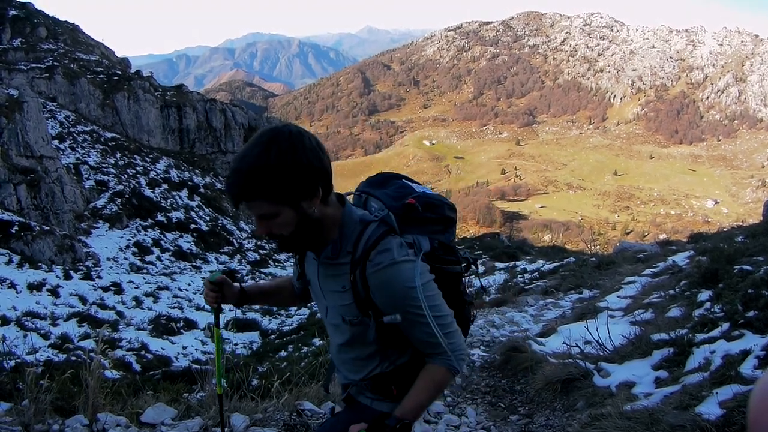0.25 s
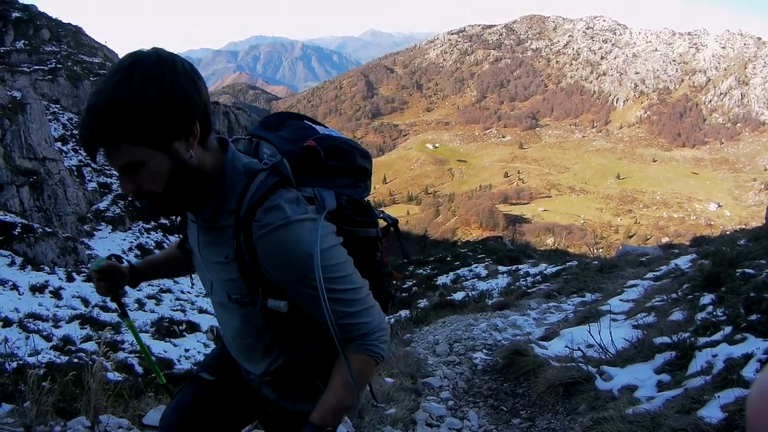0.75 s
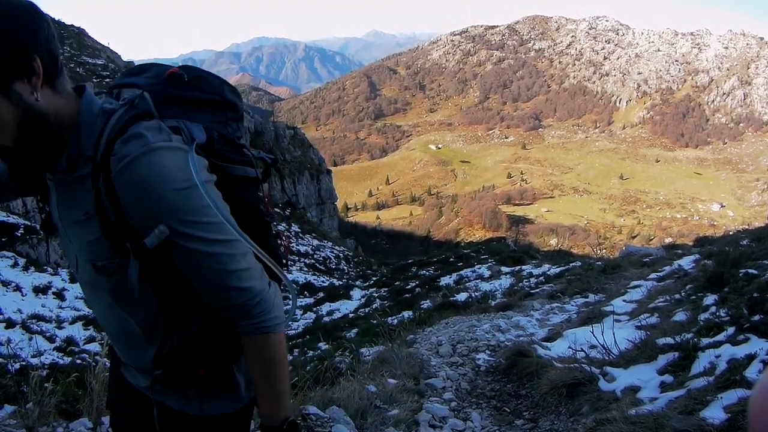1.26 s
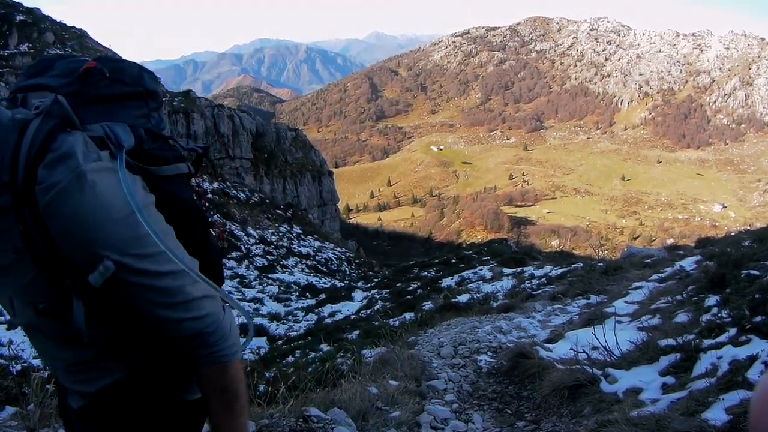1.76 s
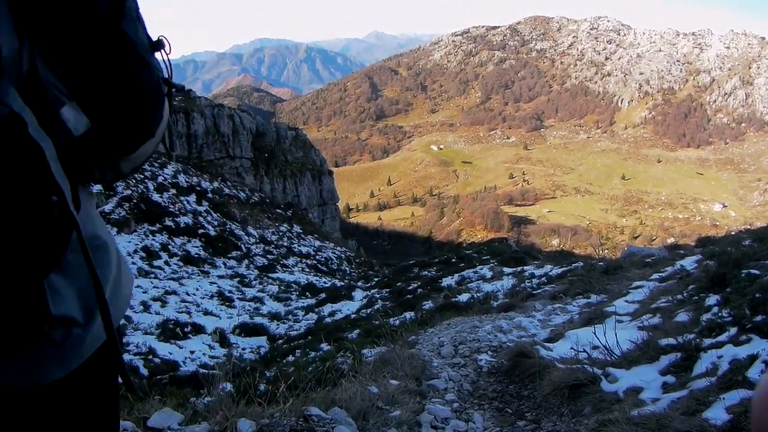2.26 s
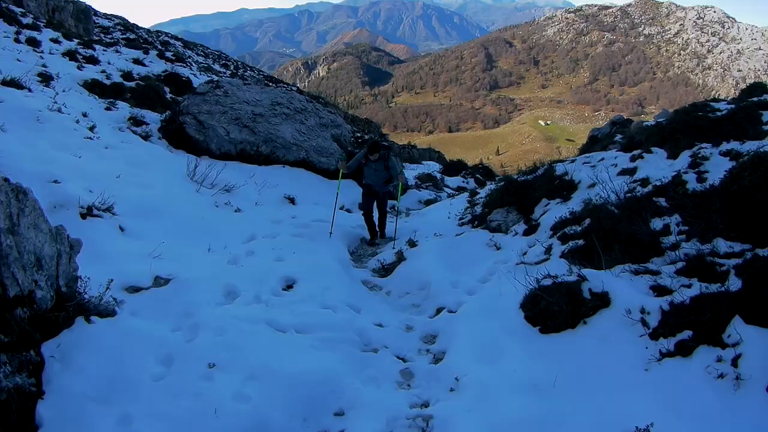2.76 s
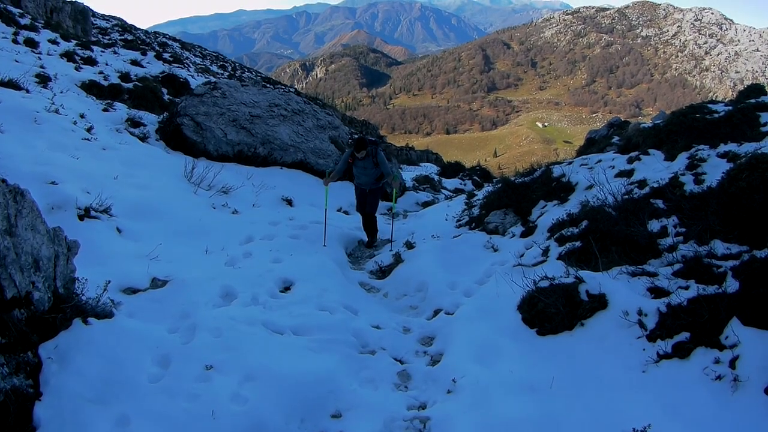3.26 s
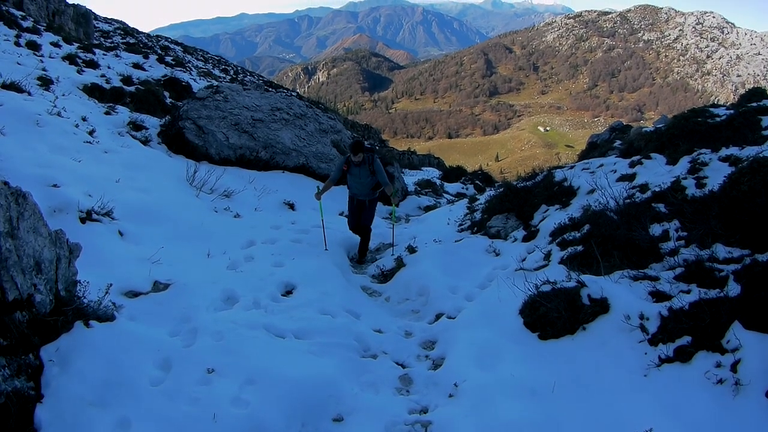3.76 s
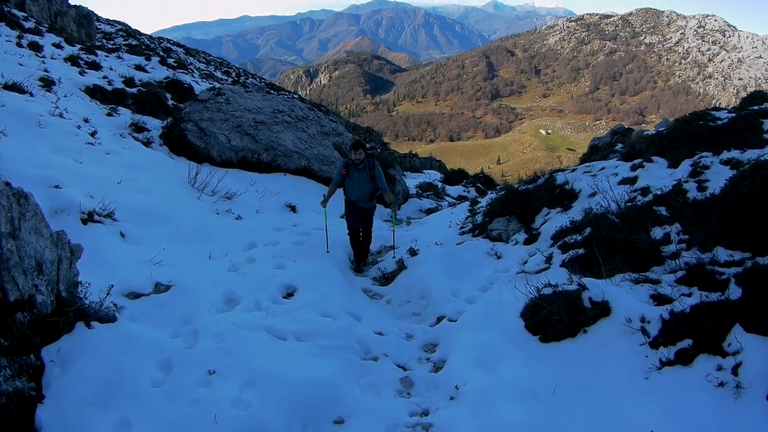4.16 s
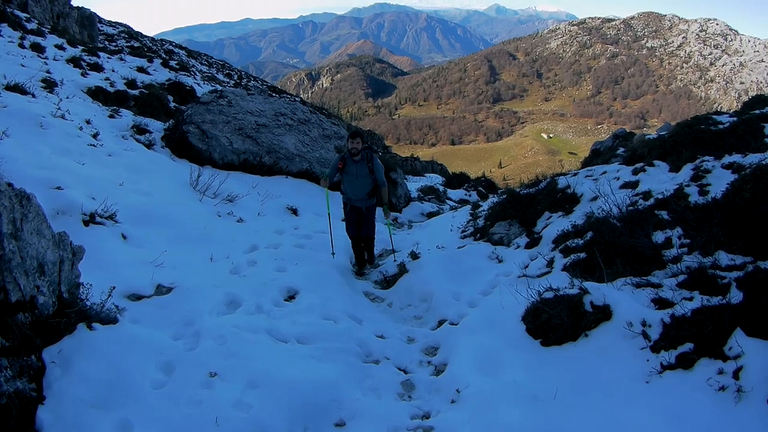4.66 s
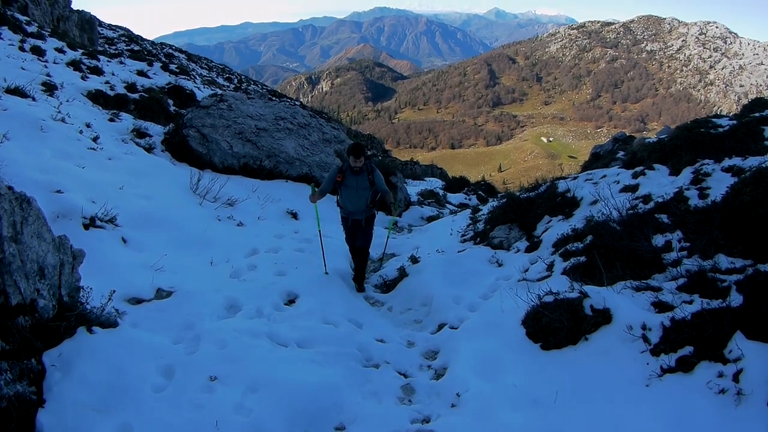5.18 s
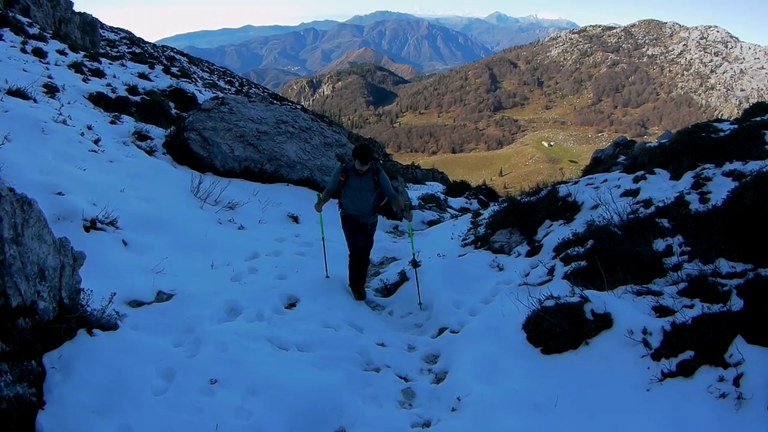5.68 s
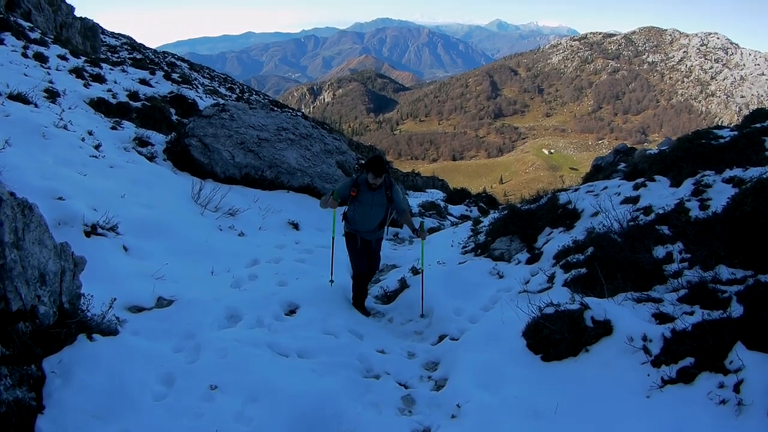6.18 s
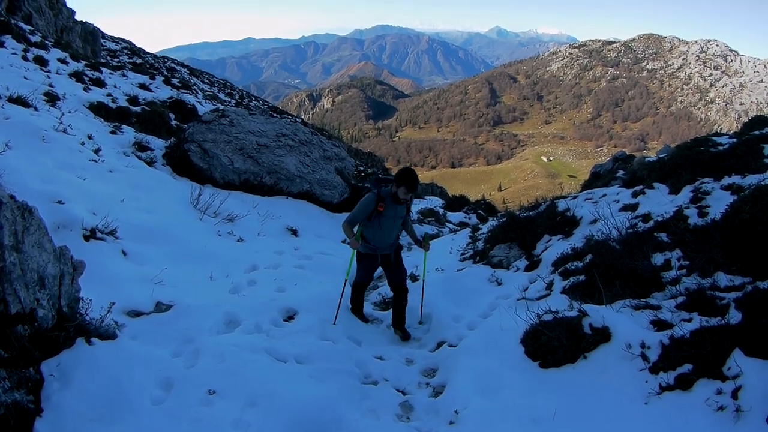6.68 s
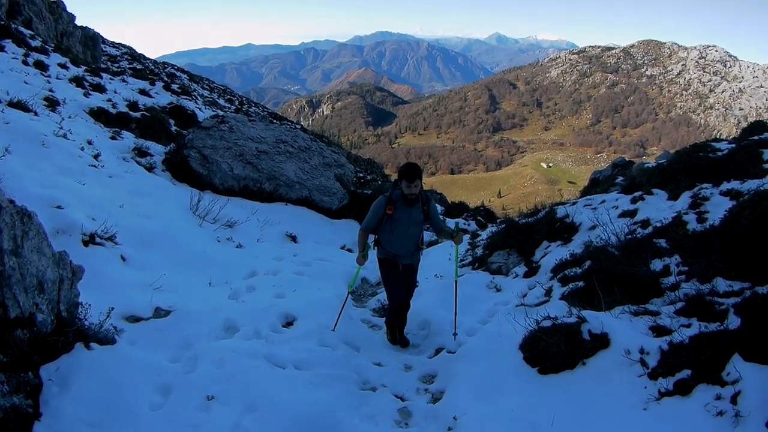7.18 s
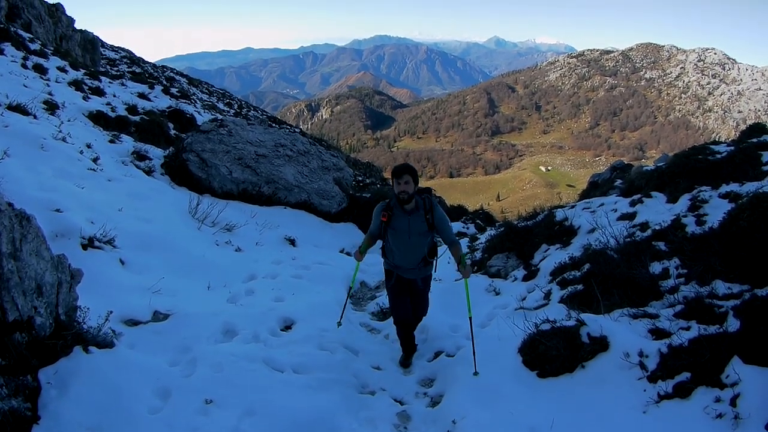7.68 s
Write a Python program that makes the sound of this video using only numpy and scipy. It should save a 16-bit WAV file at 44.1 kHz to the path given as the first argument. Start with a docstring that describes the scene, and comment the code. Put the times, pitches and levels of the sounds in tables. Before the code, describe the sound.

Outdoors on a mountain slope, stones tick, then clatter hard and briefly ring as boots pass close by, with gravel grinding and dull thuds beneath. The densest rattle comes just before a bright click and sudden scene change. Then come separated snow steps, more distant, each a dry crust crack with a grainy crunch, closer together near the end. Soft air and slight wind rumble lie underneath.

```python
"""A hiker with poles climbs past a small camera over loose scree: stones clack, ring briefly and slide, boots thud.
After a cut, further off, boots and pole tips crunch through crusted snow in spaced steps, under thin mountain air.
Stone knocks and crust cracks are short bursts of filtered noise; slides and crunches are crowds of tiny grains.
Thuds are quickly fading low tones with some noise; the air is coloured noise with a rumble and a faint whine."""
import sys
import numpy as np
from scipy import signal
from scipy.fft import rfft, irfft
from scipy.io import wavfile
from scipy.ndimage import uniform_filter1d

SR = 44100
rng = np.random.default_rng(int(sys.argv[2]) if len(sys.argv) > 2 else 0)


def dump(signal):
    """Clip the signal to [-1, 1] and save it as 16-bit WAV at the path in sys.argv[1]."""
    limited = np.clip(np.atleast_2d(signal).T, -1, 1)
    pcm = np.round(limited * 32767).astype(np.int16)
    wavfile.write(sys.argv[1], SR, pcm)


N = 349801
CUT_S = 2.799  # the scree scene ends and the snow scene starts here


def undb(db):
    """Turn decibels into a plain gain."""
    return 10 ** (np.asarray(db) / 20)


def unit(x):
    """Scale a sound to an average (RMS) level of 1."""
    return x / np.sqrt(np.mean(x ** 2))


def curve(rows):
    """Draw straight lines between the rows of a (t/s, ..) table: one curve per column."""
    t_s, *columns = np.transpose(rows)
    return [np.interp(np.arange(N) / SR, t_s, column) for column in columns]


def colour(x, points):
    """Filter with the gains of (f/Hz, gain/dB) points, without sounding ahead of time (minimum phase)."""
    hz, db = np.transpose(points)
    grid_hz = np.maximum(np.arange(1025) * SR / 2048, 1)
    gain_db = np.interp(np.log(grid_hz), np.log(hz), db)
    # folding the cepstrum moves the whole response after time zero
    cepstrum = irfft(np.log(undb(gain_db)))
    cepstrum[1:1024] *= 2
    cepstrum[1025:] = 0
    response = irfft(np.exp(rfft(cepstrum)))
    return signal.fftconvolve(x, response)[:N]


def band(x, lo_hz, hi_hz):
    """Keep mainly the pitches between two frequencies."""
    sos = signal.butter(2, [lo_hz, min(hi_hz, .45 * SR)], "band", fs=SR, output="sos")
    return signal.sosfilt(sos, x)


def walk(rate):
    """Wander at random: levels held for 1 / rate s, then smoothed twice; spread near 1."""
    hold = int(SR / rate)
    steps = np.repeat(rng.standard_normal(N // hold + 1), hold)
    return 1.3 * uniform_filter1d(uniform_filter1d(steps, hold), hold)[:N]


def add(out, s, piece, db):
    """Mix a piece in at time s with the given peak."""
    start = int(s * SR)
    piece = piece[:N - start]
    out[start:start + len(piece)] += piece * undb(db) / np.max(np.abs(piece))


def grains(rate, spread_db, smear_s, fine):
    """Tiny fractures at random moments, each a short noisy burst, over a share of grains too fine to tell apart."""
    breaks = rng.random(N) < rate / SR  # rate: breaks per second
    sizes = breaks * undb(spread_db * np.minimum(rng.exponential(size=N), 4))
    fade = np.exp(-1 / (smear_s * SR))
    bursts = unit(signal.lfilter([1], [1, -fade], sizes))
    return unit((bursts + fine) * rng.standard_normal(N))


def crushing(levels, spectrum, rate, spread_db, smear_s, fine, shared, creak):
    """Grains break under load, each size at its own moments and pitch; the packed mass answers in the lower mids."""
    load_db, mass_db = levels
    edges_hz = [300, 1000, 1700, 2600, 3600, 5000, 7500, 19000]
    mixed = shared * grains(rate, spread_db, smear_s / 2, fine)  # breaks heard at every pitch at once
    for lo_hz, hi_hz in zip(edges_hz, edges_hz[1:]):
        mixed = mixed + band(grains(rate, spread_db, smear_s, fine), lo_hz, hi_hz)
    grit = colour(mixed * undb(load_db), spectrum) / np.std(colour(mixed, spectrum))

    lumps = grains(rate, spread_db / 2, 3 * smear_s, fine)
    loaded = lumps * undb(mass_db)
    body = band(loaded, 180, 590)
    body += creak * band(loaded, 1050, 1350)  # squeezed lumps creak
    return grit + body / np.std(band(lumps, 120, 580))


def strays(load_db, span, count, over_db, spread_db, treble_db):
    """Small knocks at chance moments, as strong as the load of that moment allows."""
    when, size, pitch, ring = rng.random((count, 4)).T
    s = span[0] + (span[1] - span[0]) * when
    db = load_db[(s * SR).astype(int)] + over_db + spread_db * size
    hz, t60 = 1100 * 4 ** pitch, .004 + 0.023 * ring
    return [(*row, treble_db, decay) for *row, decay in zip(s, db, hz, t60)]


def knocks(table, sharpness, ring_db, chips_db, settle_db, snap, rise_s):
    """Each blow is a snap and a rough tail: a main resonance, three chance ones, crack, treble and lower mids."""
    out, t = np.zeros(N), np.arange(6144) / SR
    half = 1 / (2 * sharpness)  # half the width of a resonance, as a share of its pitch
    for s, db, hz, treble_db, t60 in table:
        # higher rings come with weaker lower mids
        low_db = -15.5 - 5.5 * np.log2(hz / 2000) + 3.5 * rng.standard_normal()
        fall = np.exp(-np.log(1000) * t / max(t60, .003))
        # neighbours shift and settle for a while after the blow
        settling = undb(settle_db) * np.exp(-np.log(1000) * t / (t60 + 0.091))
        force = rng.standard_normal((4, len(t))) * (1 - np.exp(-t / rise_s)) * (fall + settling)
        force[:, int(rise_s * SR)] += snap  # first contact
        ring = band(force[0], hz * (1 - half), hz * (1 + half))
        add(out, s, ring, db + ring_db)
        chips_hz = rng.uniform(1500, 5230, size=3)
        chips = sum(band(force[1], f * (1 - half), f * (1 + half)) for f in chips_hz)
        add(out, s, chips, db + chips_db)
        crack = band(band(force[1], 1300, 6000), 1300, 6000)
        add(out, s, crack, db - 3.5)
        treble = band(band(force[2], 4400, 11000), 5200, 12500)
        add(out, s, treble, db + treble_db)
        add(out, s, band(force[3], 700, 1400), db + low_db)
    return out


def air():
    """Open-slope hush with a slow swell, wind rumble and a faint whine."""
    # tone of the hush: f/Hz, relative level/dB
    hush_tone = [(12, -27), (20, 2), (38, -11.5), (130, -5), (158, -8), (388, -10), (422, -8.5), (718, -15),
                 (1530, -24), (1710, -20.5), (2080, -21.5), (9400, -30), (16000, -29.5)]
    # wind on the microphone: t/s, middle level/dB
    gusts = [(0.0, -69), (0.37, -62), (0.82, -72), (1.3, -61), (1.7, -62), (2.36, -54), (2.58, -57.5),
             (3.24, -69), (3.75, -69.5), (4.02, -73.5), (5.1, -68.5), (5.56, -74), (5.87, -67.5),
             (7.24, -70.5), (7.44, -63.5), (7.93, -79)]
    # thin steady tone: f/Hz, RMS level/dB
    whine_tone = [(13717, -80)]
    hush = unit(colour(rng.standard_normal(N), hush_tone)) * undb(-60.5 + 1.8 * walk(2.6))
    rumble = unit(band(rng.standard_normal(N), 22, 90)) * undb(curve(gusts)[0] + 3.3 * walk(11.0))
    (hz, db), = whine_tone
    whine = np.sqrt(2) * undb(db) * np.sin(2 * np.pi * hz * np.arange(N) / SR)
    return hush + rumble + whine


def presses():
    """Each press swells, holds and lets go; overlapping presses add their power."""
    # boot or pole pressing snow: peak t/s, crunch level/dB, body level re crunch/dB,
    # rise/s, hold/s, release/s (rise and release are the times for a 20 dB change)
    pack = [(2.874, -40.5, -12, 0.044, .001, 0.068), (2.936, -62, -8.5, 0.016, 0.49, 0.36),
            (3.501, -59, -2.5, 0.022, 0.11, 0.12), (3.646, -57, 4, .05, 0.0011, 0.1),
            (3.782, -66.5, -7, .02, 0.011, .05), (3.847, -60.5, -10, 0.11, 0.029, 0.052),
            (4.22, -51, -1.5, 0.011, 0.00085, .05), (4.265, -62, -4, .03, 0.042, 0.07),
            (4.364, -56.5, -3.5, 0.026, 0.029, 0.069), (4.625, -61.5, -8.5, .08, .001, .38),
            (4.852, -41.5, -15, 0.005, 0.023, .03), (4.889, -30.5, -21, 0.022, .001, 0.017),
            (4.907, -55, -5, .01, .001, 0.26), (5.005, -41, -7, .006, .012, .03),
            (5.022, -38, -1, 0.021, .001, 0.064), (5.096, -48, -1.5, 0.0098, 0.026, 0.11),
            (5.17, -47.5, 1.5, 0.058, 0.023, 0.11), (5.402, -58, -3.5, .17, 0.0011, 0.21),
            (5.627, -53, -1.5, 0.017, .001, 0.012), (5.737, -31.5, -6, 0.011, 0.00082, .075),
            (5.83, -60, 2, 0.022, 0.051, .03), (5.908, -53.5, -0.5, .04, .001, 0.23),
            (6.01, -44.5, 2.5, 0.036, .001, 0.02), (6.1, -36.5, -3, 0.084, .001, 0.087),
            (6.418, -47.5, -7, 0.0052, 0.011, 0.032), (6.441, -33, -12, 0.01, 0.00093, 0.032),
            (6.482, -56.5, -5, .02, .13, .02), (6.633, -37, -2, 0.015, .001, 0.057),
            (6.71, -49.5, -0.5, 0.055, 0.019, 0.19), (6.775, -53.5, -5.5, .08, 0.097, 0.032),
            (7.301, -41.5, -11, 0.0042, .01, .03), (7.316, -37.5, -2, 0.01, 0.031, 0.028),
            (7.38, -53, 8, 0.019, 0.035, .02), (7.441, -33, -10, 0.029, .001, .12),
            (7.602, -35.5, -6, 0.16, .001, .03), (7.621, -44.5, -6.5, .01, .001, 0.12),
            (7.794, -52, -9, .2, 0.0011, 0.13), (7.925, -62, -9, 0.091, 0.012, .1)]
    t, crunch, body = np.arange(N) / SR, 1e-9, 1e-9
    for s, db, body_db, rise_s, hold_s, release_s in pack:
        away = np.maximum((s - t) / rise_s, (t - s - hold_s) / release_s).clip(0, 8)
        power = undb(db - 20 * away) ** 2
        crunch = crunch + power
        body = body + power * undb(body_db) ** 2
    return 10 * np.log10(crunch), 10 * np.log10(body)


def off_slope(x, share, lag_s):
    """The snow slope sends a second copy just behind; its lag wanders at random, which bands the colour."""
    lag = lag_s * SR * (1 + 0.18 * walk(1.509))
    return x + share * np.interp(np.arange(N) - lag, np.arange(N), x)


def crusted_snow():
    """Snow crust cracks sharply while the snow below crunches as its grains break under each press."""
    # clearest breaks of the crust: t/s, base level/dB, centre f/Hz, treble re base/dB,
    # decay by 60 dB/s (3 ms at least, before the settling tail)
    cracks = [(2.8548, -33, 1900, -12, 0.047), (2.884, -23, 2570, -7.5, 0.045),
              (3.6389, -41, 1045, -1.5, .005), (3.6492, -38.5, 976, -5, .022),
              (4.1844, -40.5, 1120, -20.5, 0.0074), (4.2173, -38, 2463, -10, 0.022),
              (4.3559, -46.5, 1250, -19, .013), (4.8598, -25.5, 2240, -12, .028),
              (4.8858, -14, 2600, -13, 0.027), (4.9607, -40, 2220, -11, 0.0045),
              (5.0173, -29, 2600, -21, 0.0033), (5.0982, -23, 2600, -24, 0.0046),
              (5.1394, -26, 2450, -21, .009), (5.159, -38, 3000, -21, .008),
              (5.1995, -38, 2600, -19, 0.032), (5.2834, -42, 2586, -16, 0.0096),
              (5.5425, -48, 2410, -14.5, 0.0065), (5.6264, -33.5, 2990, -16.5, 0.0025),
              (5.7312, -30, 3920, -6, 0.075), (5.7415, -31, 1080, -3, 0.019),
              (5.7537, -38, 1200, -12, .033), (5.863, -42, 3550, 1, .01), (5.9148, -38, 1220, -15, 0.026),
              (6.045, -32, 1280, -16.5, .047), (6.4145, -29, 4480, -7, .11),
              (6.4235, -25.5, 3810, -17, 0.072), (6.4339, -13.5, 3760, -15, 0.051),
              (6.4381, -27.5, 1490, -15, .059), (6.498, -36, 1340, -24, .01),
              (6.6269, -26, 1960, -12, 0.053), (6.7143, -38, 1015, -14, .059),
              (7.3353, -28.5, 1530, -25.5, 0.088), (7.387, -41, 1500, -18, 0.0092),
              (7.4329, -27, 1310, -21, 0.045), (7.4422, -14, 3680, -28, 0.0043),
              (7.4487, -23, 2930, -1, 0.0093), (7.565, -29.5, 3900, -7, 0.052),
              (7.5932, -21, 2500, -19, .028), (7.6025, -38.5, 1350, -14, 0.013),
              (7.6684, -37, 2920, -19, .005), (7.736, -39, 3730, -18, .009),
              (7.7482, -37, 2920, -23, 0.0095), (7.7775, -37, 3700, -21, .008),
              (7.8572, -39, 2400, -15, .004), (7.9047, -39.5, 3030, -8, 0.0044)]
    # tone of the crunch: f/Hz, relative level/dB
    snow_tone = [(350, -47.5), (600, -2.5), (834, -10), (1310, -4.5), (1700, -8), (2910, -2.5), (3340, -5),
                 (3890, -5.5), (4580, -9.5), (8390, -17), (16000, -25.5)]
    press = presses()
    small = strays(press[0], (CUT_S, N / SR - .01), count=24, over_db=12.5, spread_db=8.0, treble_db=-10.5)
    sound = knocks([*cracks, *small], sharpness=3.64, ring_db=-8.0, chips_db=-8.0,
                   settle_db=-20.5, snap=3.6, rise_s=0.00026)
    sound += crushing(press, snow_tone, rate=400.0, spread_db=4.0, smear_s=0.0025,
                      fine=1.0, shared=0.63, creak=0.51)
    return off_slope(sound, share=0.33, lag_s=0.000835)


def thuds():
    """The sole pushes the ground: a damped low swing roughened by grit, and a slower deep bump."""
    # boot soles landing: t/s, base level/dB, ground f/Hz, deep bump re base/dB, base decay/s (17 ms is added)
    landings = [(0.1406, -39, 356, -28, 0.0099), (0.214, -31.5, 443, -10, 0.026),
                (0.684, -42, 210, -15, 0.024), (0.886, -22.5, 316, -15, 0.01),
                (0.9012, -25.5, 400, -20, 0.0059), (1.0695, -37, 510, -27, 0.0069),
                (1.1744, -30.5, 352, -23, 0.016), (1.2544, -39.5, 450, -11, 0.047),
                (1.3476, -30, 553, -30, 0.068), (1.3542, -24, 376, -28, 0.038),
                (1.4474, -27.5, 382, -35, 0.0059), (1.5149, -34, 480, -31, 0.0058),
                (1.6908, -20, 288, -21, 0.0048), (1.7963, -34, 352, -30, 0.0063),
                (2.0636, -20.5, 500, -37, 0.0061), (2.235, -35, 494, -17, 0.0081),
                (2.3824, -40.5, 185, -11, 0.049), (2.4087, -23, 426, -32, 0.0024),
                (2.508, -15.5, 567, -32, 0.013), (2.596, -48, 500, -20, 0.009), (2.758, -38, 660, 1, 0.037),
                (3.4949, -38.5, 217, -10, 0.03), (3.6407, -39.5, 248, -13.5, 0.054),
                (4.216, -42, 243, -10, 0.022), (5.013, -39.5, 292, -21, 0.048),
                (5.732, -34.5, 152, -9, 0.014), (5.9595, -38.5, 302, -24, 0.017),
                (6.6249, -34, 616, -5, 0.06), (6.646, -34.5, 165, 0, 0.034), (7.325, -35.5, 600, -21, 0.11),
                (7.4323, -34, 584, -14, 0.032), (7.4443, -31, 354, -22, 0.008),
                (7.5952, -51, 272, 2, 0.015)]
    out, t = np.zeros(N), np.arange(8192) / SR
    for s, db, hz, deep_db, t60 in landings:
        swing = (1 - np.exp(-t / 0.003)) * np.exp(-np.log(1000) * t / (t60 + 0.017))
        add(out, s, np.sin(2 * np.pi * hz * t) * swing, db - 2.0)
        grit = band(band(rng.standard_normal(len(t)) * swing, 120, 650), 90, 750)
        add(out, s, grit, db - 5)
        bump = (1 - np.exp(-t / .008)) * np.exp(-t / 0.013)
        add(out, s, np.sin(2 * np.pi * rng.uniform(30, 65) * t) * bump, db + deep_db)
    return out


def loose_scree():
    """Stones clack and ring over gravel grinding under the boots; a bright click ends the scene."""
    # clearest stone knocks; the last row is the bright click at the cut between scenes:
    # t/s, base level/dB, ring f/Hz, treble re base/dB,
    # decay by 60 dB/s (3 ms at least, before the settling tail)
    knocks_and_click = [(0.019, -39.5, 4180, -6.5, 0.022), (0.0829, -31.5, 2770, -17, 0.017),
                        (0.118, -26.5, 2280, -12, 0.055), (0.1422, -31.5, 1390, -5, 0.018),
                        (0.2144, -31, 1170, -6, 0.038), (0.2247, -30, 1940, -23, 0.026),
                        (0.3223, -23.5, 4850, -21, 0.018), (0.3803, -36, 2110, -21, 0.0044),
                        (0.4633, -32, 1240, -25, 0.0076), (0.4798, -28, 2260, -23, 0.01),
                        (0.5641, -39.5, 4240, -12, .16), (0.682, -20, 1650, -8.5, 0.035),
                        (0.6875, -14, 1500, -7, 0.018), (0.7026, -21.5, 1660, -18, 0.063),
                        (0.7142, -36, 1680, 1, .008), (0.8871, -40, 1140, -23, .006),
                        (0.904, -35.5, 1250, -6, .02), (0.9499, -37, 1850, -17, .004),
                        (0.9732, -20, 3070, -7.5, 0.0027), (0.9765, -22.5, 3920, -19, 0.012),
                        (1.071, -40, 1040, -17, 0.0091), (1.1595, -34.5, 3200, -15, .004),
                        (1.2255, -30, 3000, -20, 0.033), (1.2546, 1.5, 2155, -10.5, 0.027),
                        (1.263, -10, 1990, -1.5, 0.032), (1.3229, -11, 2140, -18, 0.03),
                        (1.329, -8, 4070, -27, 0.013), (1.3375, -3, 2100, -17, 0.011),
                        (1.3461, -4.5, 3340, -4.5, 0.035), (1.3505, -16, 1890, -21, 0.011),
                        (1.3567, -9, 1990, -24, 0.01), (1.3634, -13, 4200, -26, .017),
                        (1.3809, -3.8, 3770, -8, 0.017), (1.388, -6, 5130, -21, 0.0096),
                        (1.4404, -20, 4130, -26, 0.056), (1.4482, -20, 2100, -28, .021),
                        (1.494, -21, 3540, -18, 0.02), (1.5155, -24, 2230, -13, 0.014),
                        (1.5602, -16.5, 3000, -19, 0.0055), (1.5719, -17.5, 3870, -11, 0.026),
                        (1.5778, -18, 2980, -33, 0.0067), (1.583, -18, 4400, -9, .003),
                        (1.6004, -10.5, 3890, -30, 0.014), (1.6157, -40, 3500, -21, 0.0083),
                        (1.6345, -20, 4500, -8.5, 0.0024), (1.6511, -30, 3550, -20, 0.0068),
                        (1.7034, -27.5, 1670, -32, 0.02), (1.7975, -37.5, 980, -21, .003),
                        (1.8795, -29, 920, 4, 0.017), (1.9283, -20, 4400, -24, .014),
                        (1.9338, -19, 2580, -14, .026), (1.9444, -8, 3900, -7, 0.0074),
                        (1.9498, -10, 3070, -24, 0.009), (1.9759, -22, 2400, -33, 0.024),
                        (1.9898, -21, 4400, -23, .004), (1.9966, -10, 2450, -40, 0.023),
                        (2.0018, -10, 3540, -28, 0.0024), (2.0417, -26, 4500, -30, .024),
                        (2.0514, -20, 2450, -28, .008), (2.0655, -15, 2270, -40, 0.065),
                        (2.0839, -17.5, 4000, -4, .003), (2.0915, -5.5, 3540, -28, 0.014),
                        (2.1017, -19.5, 2480, -16, 0.051), (2.1407, -25, 3680, -16, 0.011),
                        (2.2368, -16.5, 2830, -25, 0.0052), (2.2543, -25.5, 1250, -29, .007),
                        (2.3511, -26, 1550, -5, 0.0069), (2.3851, 5, 3920, -6.5, 0.024),
                        (2.3983, -1.5, 3100, -7, 0.023), (2.4095, -5, 3030, -4, 0.022),
                        (2.4173, -12, 3940, -2, .014), (2.4299, -23, 3860, -10, 0.014),
                        (2.4385, -9, 2470, -14, 0.011), (2.4407, -5, 3950, -12, 0.012),
                        (2.4504, -12, 3600, -3, .009), (2.4627, -5.5, 4000, -4, 0.0092),
                        (2.4784, -24, 1610, -19, .006), (2.4866, -19, 3120, -20, 0.028),
                        (2.494, -14.5, 2190, -13, 0.071), (2.4972, -13, 4160, -4, .006),
                        (2.5068, -13.5, 4340, -4.5, 0.031), (2.5167, -21, 3870, -17, 0.011),
                        (2.5268, -25, 4160, -24, .01), (2.541, -34, 3800, -24, .012),
                        (2.5934, -21.5, 3920, -25, 0.0069), (2.602, -17.5, 2190, -14, 0.0026),
                        (2.6098, -21, 4020, -26, .02), (2.6152, -22, 4140, -13, .005),
                        (2.6898, -26, 4000, -18, 0.044), (2.706, -16, 1120, -31, 0.029),
                        (2.7156, -19, 1830, -22, 0.0033), (2.7307, -17, 4300, -15.5, .008),
                        (2.7757, -11.5, 4600, -25, 0.0053), (2.7906, -5, 7100, -5, 0.0021)]
    # gravel sliding under the boots: t/s, grit level/dB, body level/dB
    slide_rows = [(0.0, -65, -69), (0.31, -54.5, -54.5), (0.56, -50, -54), (0.68, -60, -60),
                  (0.85, -60.5, -58), (0.92, -57, -55.5), (1.24, -49.5, -50.5), (1.27, -49, -52),
                  (1.35, -35, -45.5), (1.48, -46, -46.5), (1.72, -52, -54.5), (1.9, -49.5, -55),
                  (1.94, -39.5, -38.5), (2.05, -41, -39.5), (2.16, -44, -44.5), (2.33, -47, -55.5),
                  (2.38, -43, -49), (2.4, -34, -45.5), (2.62, -41.5, -44), (2.72, -36, -46.5),
                  (2.8, -42.5, -44.5)]
    # tone of the grit: f/Hz, relative level/dB
    gravel_tone = [(350, -44.5), (600, -12), (931, -10.5), (1130, -8.5), (1610, -12), (2070, -9),
                   (3390, -11), (3890, -10.5), (6200, -18.5), (9490, -21), (16000, -30.5)]
    slide = curve(slide_rows)
    small = strays(slide[0], (0, CUT_S), count=16, over_db=8.0, spread_db=8.5, treble_db=-17.5)
    sound = knocks([*knocks_and_click, *small], sharpness=7.3, ring_db=-5.5, chips_db=-9.0,
                   settle_db=-21.0, snap=4.62, rise_s=0.00028)
    return sound + crushing(slide, gravel_tone, rate=270.0, spread_db=0.5, smear_s=0.0054,
                            fine=0.27, shared=0.47, creak=0.18)


def scene():
    """Scree up to the cut, snow after it; thuds and air run through both."""
    on_scree = np.arange(N) < CUT_S * SR
    ground = np.where(on_scree, loose_scree(), crusted_snow())
    return (ground + thuds() + air())[None]


def record(dry):
    """The camera's housing colours the sound and the loudest peaks are rounded; nothing sounds above 15900 Hz."""
    # housing colour: f/Hz, gain/dB
    housing = [(20, -0.66), (700, -1.5), (1100, 1.5), (3000, -2.1), (3900, -1), (5300, -2.5), (6200, -3),
               (8500, -1.66), (12500, -4.5), (16000, -3)]
    rounded = np.tanh(1.5 * colour(dry[0], housing)) / 1.5
    top_cut = signal.ellip(10, .2, 75, 15900, fs=SR, output="sos")  # steep low-pass
    return signal.sosfilt(top_cut, rounded)[None]


dry = scene()
out = record(dry)
dump(out)
```